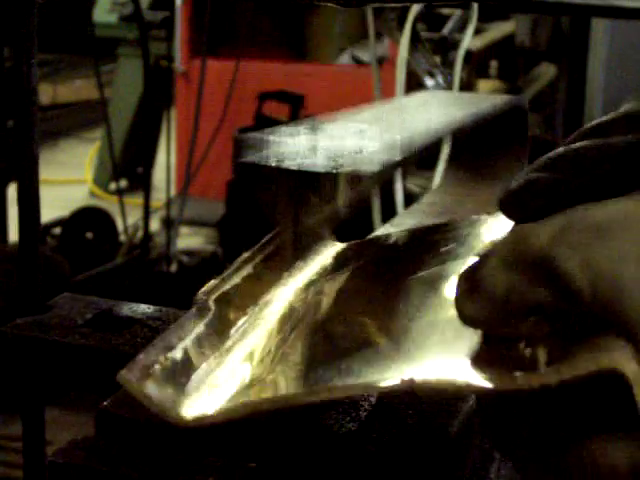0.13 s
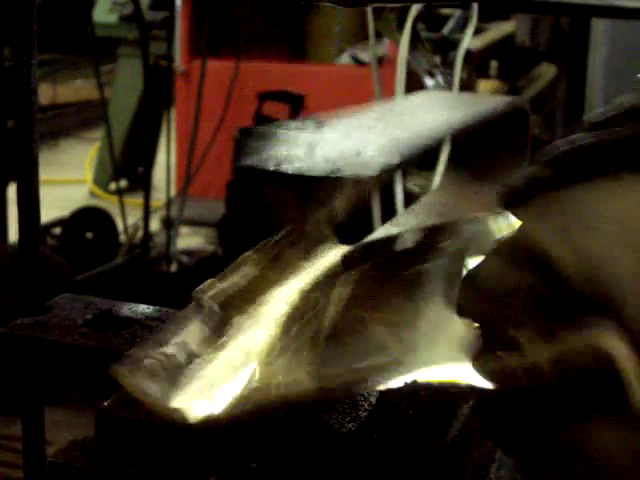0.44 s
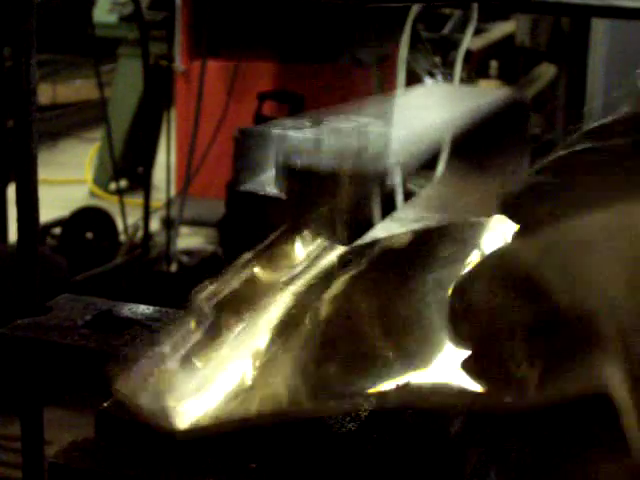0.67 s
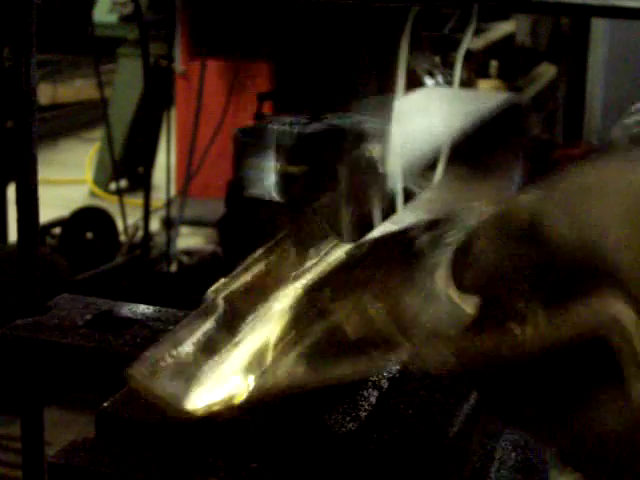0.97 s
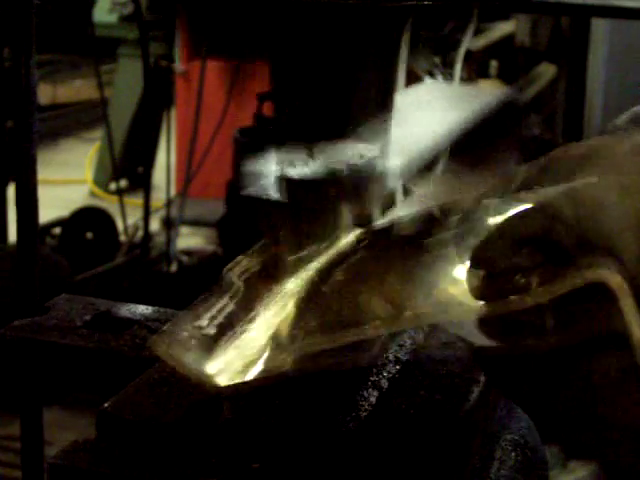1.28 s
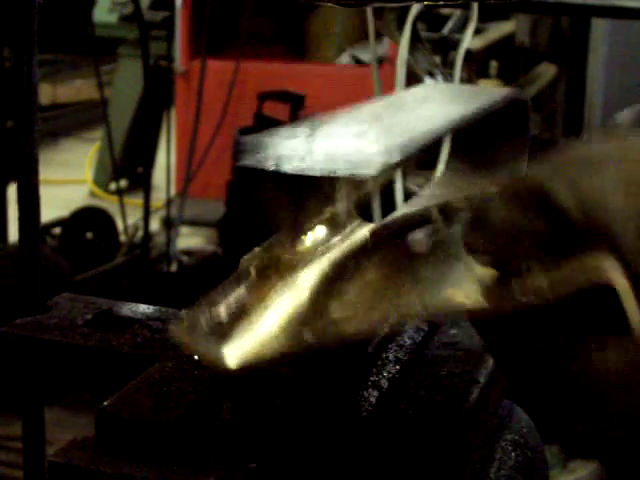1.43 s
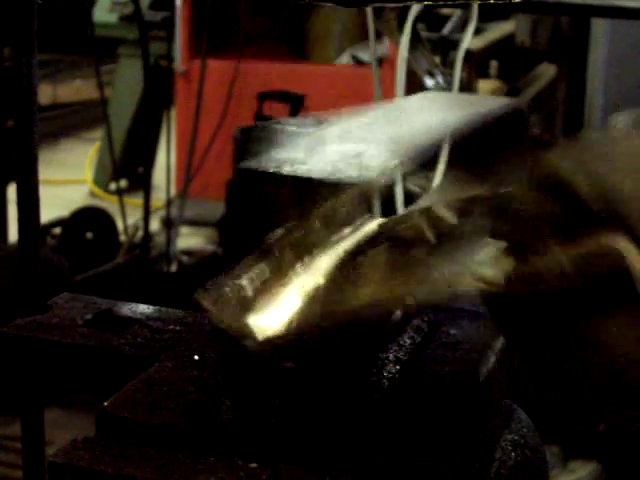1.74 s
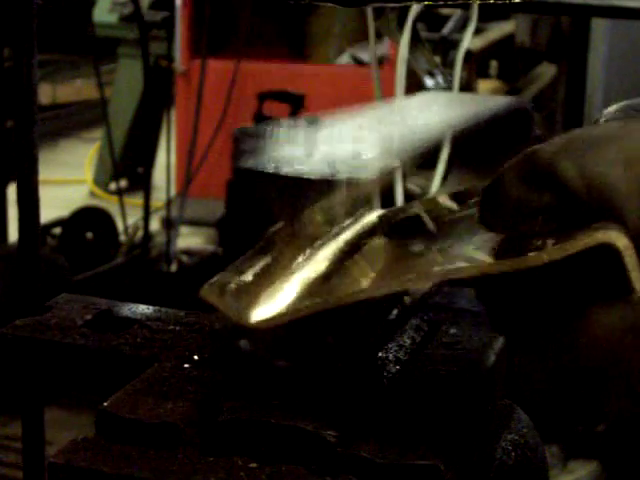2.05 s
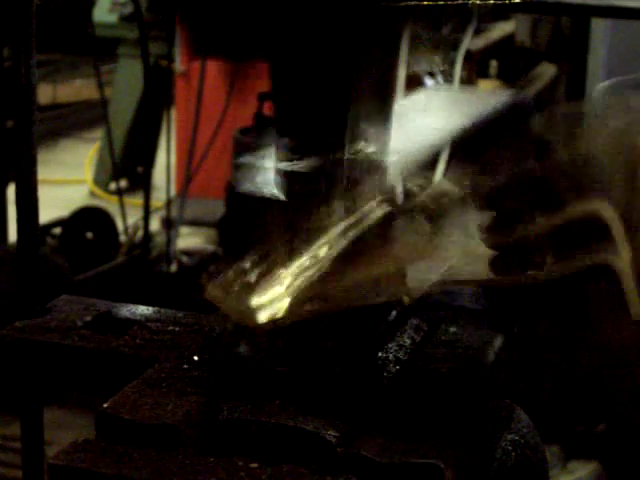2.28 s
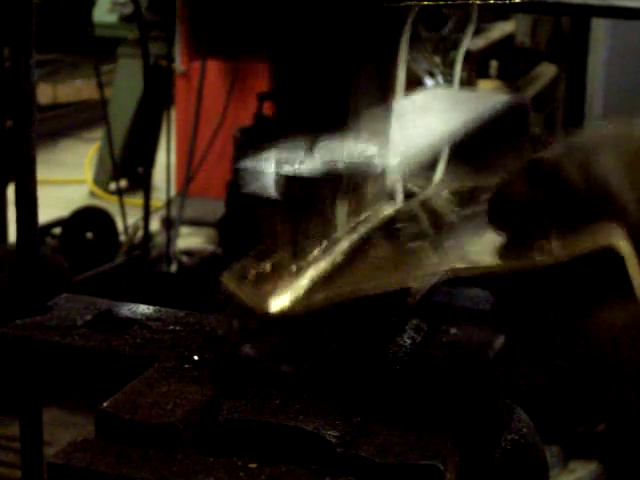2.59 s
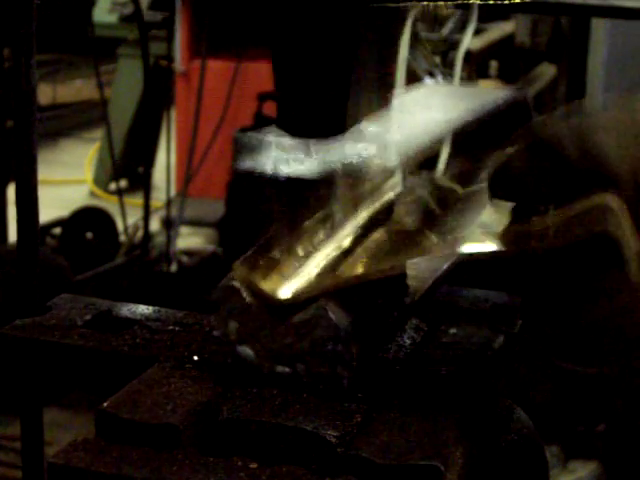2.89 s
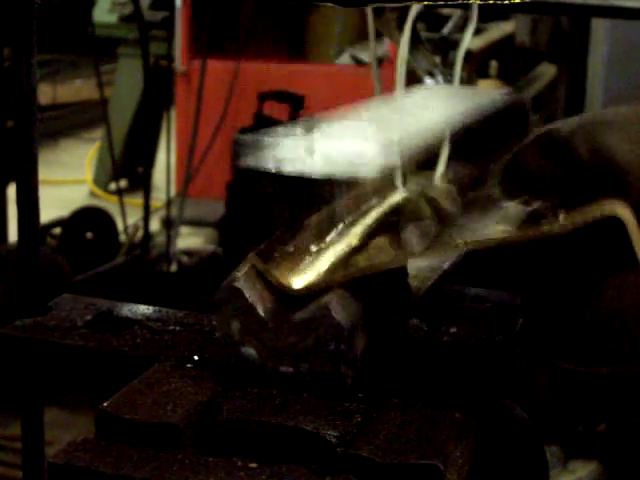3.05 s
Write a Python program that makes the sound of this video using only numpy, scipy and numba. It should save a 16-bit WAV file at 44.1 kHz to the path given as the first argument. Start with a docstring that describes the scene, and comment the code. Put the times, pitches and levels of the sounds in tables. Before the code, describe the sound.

A mechanical hammer pounds sheet metal with loud, ringing blows, three a second.

```python
"""A workshop, close to a trip hammer pounding a sheet-metal cone in a swage, three blows a second.
The linkage rubs and rumbles as the ram comes down; each blow cracks, rings the dies and the sheet,
and bounces once with a short chatter. Loose parts clank over the hum of the running motor.
An automatic gain control ducks after each hit, and the peaks overload."""
import sys
import numpy as np
from scipy import signal
from scipy.fft import rfft, irfft, next_fast_len
from scipy.io import wavfile
from numba import njit

SR = 44100
rng = np.random.default_rng(int(sys.argv[2]) if len(sys.argv) > 2 else 0)


def materialize(psi):
    """Save the field psi as 16-bit PCM at rate SR to the path in sys.argv[1].

    A 1-D psi becomes a single channel; in a 2-D psi each row is a channel.
    """
    bounded = np.clip(np.atleast_2d(psi).T, -1, 1)
    quanta = np.round(bounded * 32767).astype(np.int16)
    wavfile.write(sys.argv[1], SR, quanta)


N = 142443
PREROLL_S, TOP_HZ = 0.5, 8100
LENGTH = N + int(PREROLL_S * SR)
TIME = np.arange(LENGTH) / SR - PREROLL_S
AGE = np.arange(SR * 4 // 5, dtype=np.float32) / SR  # seconds since a contact

# Hammer blows and their trims (time [s], crack and wash [dB], ring [dB], boom [dB],
# ring mode 1 [dB], ring mode 2 [dB], ring mode 3 [dB], rub [dB], rumble [dB])
BLOWS = [(-.072, 1, -3.4, -8, 6, 4.5, -4, 0, 0), (0.2663, -0.54, -0.61, -8, -3.5, -4.5, 2, 0, 0.33),
         (.6058, 0.58, -4.7, -25, -2, 2, 5, -3.5, 2), (0.9318, -0.96, -1.7, 1, -6, -12, 2.5, -1, 0.57),
         (1.2567, 0.56, -4, -0.5, -5, -10, -0.5, -3.5, -2),
         (1.5902, -0.059, -7.5, -5.5, 1.5, 4, -14, -4, 1.3),
         (1.923, -1.4, -5.8, -5, 2.5, -3, 0, -2.5, -2.1),
         (2.2475, -0.94, -6.4, -22, 1, 1.5, -1, -6.5, -2.3),
         (2.5690, -0.46, -2.9, -6, 1, -2, 3.5, 1, 0.072),
         (2.9121, -0.53, -4.9, -4, -7.5, -8.5, -6, -3.5, 0), (3.245, -1, -0.78, -1, -4, 0, 0, -2, 0.16)]
# The ram dropping back on the work (time [s], contact [dB], ring [dB], chatter [dB], chatter delay [s])
BOUNCES = [(0.0255, -6.5, 0.5, -7, .019), (.3636, -0.5, -8, -5, 0.013), (0.7037, 2, -4, 0, .015),
           (1.0301, 0, 0.5, 0.5, 0.017), (1.3548, -1.5, -0.5, -1, 0.015), (1.6878, -2, -1, -1, .015),
           (2.0188, 0, 0, -3.5, .019), (2.3434, 0, -24, -12, 0.016), (2.6661, -2.5, -1.5, -1.5, .011),
           (3.009, -1.5, 2, 0, 0.015)]
# Knocks of loose parts (time [s], level [dB], tilt above 1 kHz [dB/octave])
CLANKS = [(0.587, -19, 12), (.860, -7.5, -0.5), (1.1346, -0.5, 3.5), (1.5271, -1.5, 4.5),
          (2.183, -10.5, -7), (2.505, -13.5, -9), (2.552, -13.5, 7), (3.1071, -4.5, 2.5), (3.208, -15, 14)]
# Bright ring of dies and sheet, strongest three first (frequency [Hz], level [dB], t60 [s])
RING_MODES = [(3541, -6, .7), (5372, -1, .8), (6171, 0, .65), (2174, -11, .55), (2863, -14, .9),
              (4382, -13, .85), (4415, -11, .75), (4816, -9, .85), (5072, -13, .75), (5197, -7, .6),
              (5798, -10, .55), (6563, -7, .35), (7049, -7, .55), (7365, -16, .5)]
# Low modes of the sheet (frequency [Hz], level [dB], t60 [s])
BOOM_MODES = [(975, -1, 0.7), (1047, -17, 1), (1020, -4.5, .22), (1069, 1, .18), (1140, -15, 0.11)]
# Ring of the loose parts (frequency [Hz], level [dB], t60 [s])
CLANK_MODES = [(950, 1.5, 0.34), (1840, -4.5, 0.25), (2090, -11, 0.32), (2800, 0, 0.46), (2870, 5.5, 0.38),
               (2900, 2, 0.28), (3541, 2.5, 0.48)]
# Hard crack of a blow (frequency [Hz], level [dB])
CRACK_EQ = [(60, -23.5), (200, -15.5), (600, -12.5), (1400, -21.5), (2200, -11.5), (3500, -4), (4700, -3),
            (6200, 0.5), (7300, -4), (8200, -10.5)]
# Dense wash of weak metal modes (frequency [Hz], level [dB])
WASH_EQ = [(100, -24), (500, -11), (1000, -1), (1450, -15), (2300, 1), (2900, 0.5), (3900, 0.5), (5200, 2),
           (6600, 1.5), (7400, 0), (8100, -10)]
# Thin snap of the bounce (frequency [Hz], level [dB])
BOUNCE_EQ = [(100, -38), (1400, -24.5), (2200, -2), (3500, 3.5), (4700, 3.5), (6200, 11), (7300, -2.5),
             (8200, -1)]
# Knock of a loose part (frequency [Hz], level [dB])
CLANK_EQ = [(200, -11), (900, 1), (1500, -14.5), (2100, 0), (2900, 8), (3800, -1.5), (6200, -0.5),
            (8000, -14.5)]
# Midrange rub of the ram's guides (frequency [Hz], level [dB])
RUB_EQ = [(200, -9.5), (380, -10.5), (500, -0.5), (680, 6), (850, 3), (1000, -7.5), (1400, -20),
          (2800, -9.5), (8000, -18)]
# Low rumble of the frame (frequency [Hz], level [dB])
RUMBLE_EQ = [(25, -28), (60, -13), (110, -2.5), (170, 9), (260, 1.5), (400, -5.5), (900, -2.5),
             (2000, -19.5)]
# Motor tones (frequency [Hz], level [dB])
HUM_TONES = [(158, -50), (183, -45), (495, -45.5), (800, -44.5)]
# Steady noise bed of the shop (frequency [Hz], level [dB])
SHOP_EQ = [(20, -14.5), (60, 4.5), (120, 0.5), (180, 8), (330, 1), (520, 2.5), (850, 6), (1400, -12),
           (2800, -13), (4000, -16.5), (6500, -8.5), (8200, -33)]

CRACK_DB, RING_DB, BOOM_DB, WASH_DB = -1, -10.5, -19, -8.5
BOUNCE_RING_DB, BOUNCE_WASH_DB, CHATTER_DB = -10.5, -12.5, 0.5
CLANK_DB, RUB_DB, RUMBLE_DB, SHOP_DB = -13, -26.5, -25.5, -34.5
RIPPLE_DB = 4.5  # spread of the fine peaks and dips that colour the noise


def hammer_blows(ripple):
    """The ram lands with a crack; dies and sheet ring brightly over the sheet's lower boom."""
    out = np.zeros(LENGTH)
    for start, crack_db, ring_db, boom_db, *mode_trims_db, _, _ in BLOWS:
        crack = undb(CRACK_DB) * noise(CRACK_EQ, len(AGE), ripple=ripple) * fade(t60=0.11, hold=0.0051)
        impact = undb(crack_db) * (crack + metal_wash(ripple))
        ring = undb(RING_DB + ring_db) * metal_ring(RING_MODES, mode_trims_db)
        boom = undb(BOOM_DB + boom_db) * metal_ring(BOOM_MODES)
        add(out, start, impact + ring + boom)
    return out


def ram_bounces(ripple):
    """A tenth of a second after each blow the ram drops back, chatters and rings the metal softly."""
    out = np.zeros(LENGTH)
    for (start, contact_db, ring_db, chatter_db, delay), blow in zip(BOUNCES, BLOWS):
        contact = undb(contact_db) * fade(t60=0.044)
        chatter = undb(CHATTER_DB + chatter_db) * (AGE > delay) * fade(t60=0.02, hold=delay)
        snap = noise(BOUNCE_EQ, len(AGE), ripple=ripple) * (contact + chatter)
        wash = undb(BOUNCE_WASH_DB) * metal_wash(ripple)
        ring = undb(RING_DB + BOUNCE_RING_DB + ring_db) * metal_ring(RING_MODES, trims_db=blow[4:7])
        add(out, start, snap + wash + ring)
    return out


def metal_ring(modes, trims_db=(), scatter_db=1.5, split_hz=14.24, twin_db=0.5):
    """Decaying modes, each beating with a close twin; trims strike the first ones harder or softer."""
    out = 0
    trims_db = np.pad(np.array(trims_db, float), (0, len(modes) - len(trims_db)))
    for (hz, db, t60), trim_db in zip(modes, trims_db):
        strength, detune, phase, twin_phase = rng.standard_normal(4).tolist()
        tone = np.sin(2 * np.pi * (hz * AGE + phase))
        twin = undb(twin_db) * np.sin(2 * np.pi * ((hz + split_hz * detune) * AGE + twin_phase))
        out = out + undb(db + trim_db + scatter_db * strength) * fade(t60) * (tone + twin)
    return out


def metal_wash(ripple, rattle_db=3, rise_s=0.008):
    """A crowd of weak modes blurs into a noisy tail, rattling as it dies away in the shop."""
    rattle = undb(rattle_db * wander(count=130, size=len(AGE)))
    envelope = (1 - np.exp(-AGE / rise_s)) * fade(t60=0.62)
    return undb(WASH_DB) * noise(WASH_EQ, len(AGE), ripple=ripple) * rattle * envelope


def loose_parts(ripple, tail_db=-7, ring_db=-18):
    """Sheet and linkage knock lightly between the blows, each clank leaving a faint ring."""
    out = np.zeros(LENGTH)
    envelope = fade(t60=0.061) + undb(tail_db) * fade(t60=0.44)
    for start, db, tilt_db in CLANKS:
        knock = noise(CLANK_EQ, len(AGE), tilt_db, ripple) * envelope
        ring = undb(ring_db) * metal_ring(CLANK_MODES)
        add(out, start, undb(CLANK_DB + db) * (knock + ring))
    return out


def linkage():
    """The ram rubs in its guides and the frame rumbles on each downstroke."""
    *_, rub_db, rumble_db = np.array(BLOWS).T
    rub = noise(RUB_EQ, LENGTH, ripple=RIPPLE_DB * rng.standard_normal(300))
    rub *= downstrokes(RUB_DB + rub_db, lead_s=0.083, rise_s=0.017, hang_s=0.028, fall_s=0.016)
    rumble = noise(RUMBLE_EQ, LENGTH)
    rumble *= downstrokes(RUMBLE_DB + rumble_db, lead_s=0.075, rise_s=0.11, hang_s=0.015, fall_s=0.035)
    return rub + rumble


def downstrokes(levels_db, lead_s, rise_s, hang_s, fall_s):
    """An envelope that swells ahead of each blow and dies just after it."""
    out = np.zeros(LENGTH)
    for (start, *_), db in zip(BLOWS, levels_db):
        swell = np.clip((TIME - start + lead_s) / rise_s, 0, 1)
        decay = np.exp(-np.clip((TIME - start - hang_s) / fall_s, 0, 20))
        out += undb(db) * swell * decay
    return out


def motor(waver_db=3):
    """The drive hums, wavering in level and phase, over the shop's steady noise bed."""
    hum = np.zeros(LENGTH)
    for hz, db in HUM_TONES:
        amplitude = np.sqrt(2) * undb(db + waver_db * wander(count=60))
        hum += amplitude * np.sin(2 * np.pi * hz * TIME + wander(count=70))
    return hum + undb(SHOP_DB) * noise(SHOP_EQ, LENGTH)


def noise(eq, size, tilt_db=0, ripple=(0, 0)):
    """Unit-rms noise shaped by an EQ curve, a tilt per octave above 1 kHz and a fine ripple in dB."""
    eq_hz, eq_db = np.array(eq).T
    fft_size = next_fast_len(size)
    hz = np.maximum(np.fft.rfftfreq(fft_size, 1 / SR), 1)
    db = np.interp(np.log2(hz), np.log2(eq_hz), eq_db)
    db += tilt_db * np.maximum(np.log2(hz / 1024), 0)
    db += np.interp(hz, np.linspace(0, TOP_HZ, len(ripple)), ripple)
    spectrum = rfft(rng.standard_normal(fft_size)) * undb(db) * (hz < 1.05 * TOP_HZ)
    shaped = irfft(spectrum, fft_size)[:size]
    return shaped / shaped.std()


def undb(db):
    """Decibels to gain."""
    return 10 ** (np.asarray(db) / 20)


def fade(t60, hold=0):
    """Hold, then die away by 60 dB in t60 seconds."""
    return np.exp(-np.log(1000) / t60 * np.maximum(AGE - hold, 0))


def wander(count, size=LENGTH):
    """A drift through count random values."""
    return np.interp(np.arange(size), np.linspace(0, size, count), rng.standard_normal(count))


def add(out, start, sound):
    """Mix a sound in at a time in seconds."""
    i = max(int((start + PREROLL_S) * SR), 0)
    out[i:i + len(sound)] += sound[:max(len(out) - i, 0)]


@njit
def follow(x, attack_s, release_s):
    """Envelope follower with separate rise and fall times."""
    out, level = np.empty(len(x)), x[200]
    for i in range(len(x)):
        level += (x[i] - level) / (SR * (attack_s if x[i] > level else release_s))
        out[i] = level
    return out


def excess_db(x, threshold_db, window_s):
    """How far the short-term level stands above a threshold."""
    level_db = 10 * np.log10(follow(x ** 2, window_s, window_s) + 1e-12)
    return np.maximum(level_db - threshold_db, 0)


def scene():
    """Hammer, loose parts and drive in mono; all contacts share the metal's many weak resonances."""
    ripple = RIPPLE_DB * rng.standard_normal(500)
    mix = hammer_blows(ripple) + ram_bounces(ripple) + loose_parts(ripple) + linkage() + motor()
    return mix[None, -N:]


def record(dry, ratio=2.95, late_share=0.26, lag_s=0.015, ceiling=1.058):
    """A quick gain control and a late second one duck the hits; peaks saturate, then a low-pass cuts."""
    x = dry[0]
    quick_db = (1 - 1 / ratio) * excess_db(x, threshold_db=-15.5, window_s=0.0016)
    x = x * undb(-follow(quick_db, attack_s=0.0086, release_s=0.041))
    late_db = late_share * excess_db(x, threshold_db=-12, window_s=0.025)
    x = x * undb(-np.interp(np.arange(N) - lag_s * SR, np.arange(N), late_db))
    saturated = ceiling * np.tanh(x / ceiling)
    lowpass = signal.ellip(10, 0.2, 80, TOP_HZ, fs=SR, output="sos")
    return np.clip(signal.sosfilt(lowpass, saturated), -1, 1)[None]


dry = scene()
out = record(dry)
materialize(out)
```